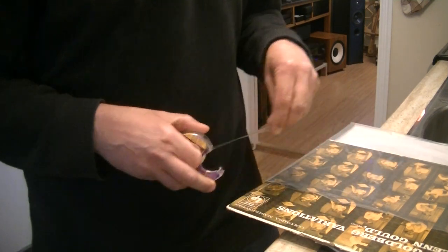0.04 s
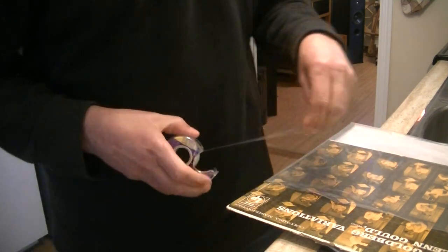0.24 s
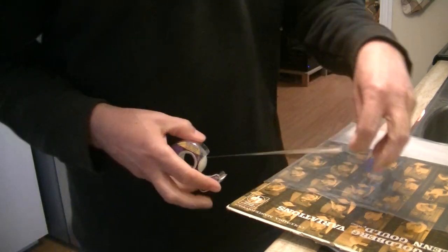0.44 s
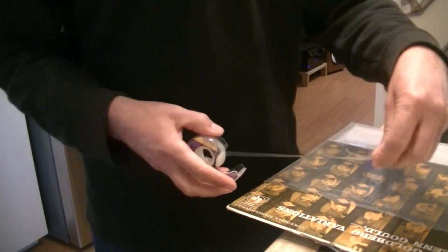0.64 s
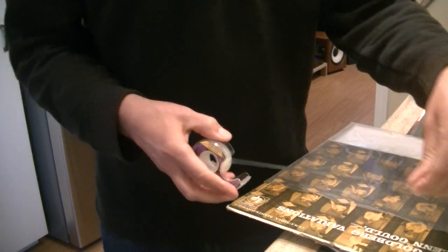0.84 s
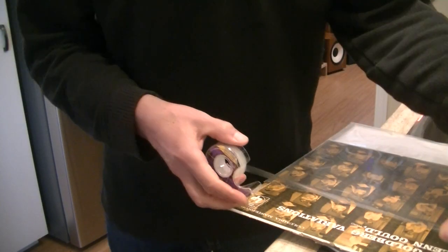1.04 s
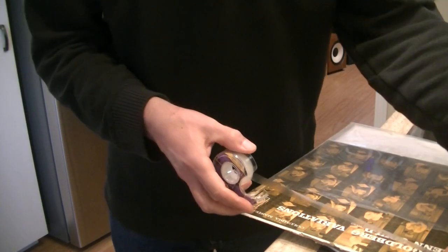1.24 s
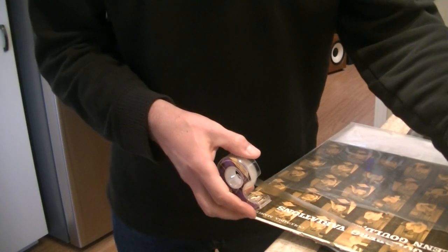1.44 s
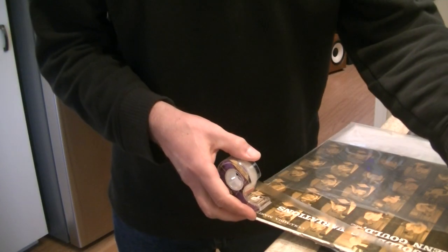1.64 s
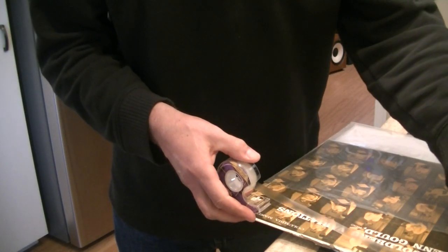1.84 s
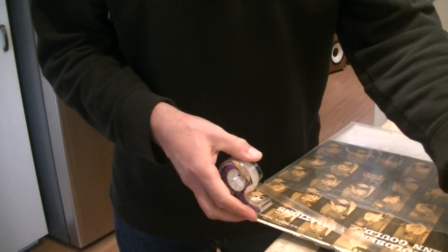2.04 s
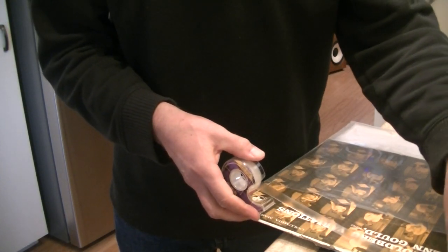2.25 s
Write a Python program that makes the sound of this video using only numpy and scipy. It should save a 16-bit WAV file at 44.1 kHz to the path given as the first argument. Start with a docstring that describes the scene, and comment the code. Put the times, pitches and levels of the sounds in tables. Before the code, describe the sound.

A quick harsh peel of sticky tape from its roll, followed by plastic clicks and faint crackle

```python
"""Adhesive tape is pulled from a small plastic hand dispenser in a quiet living room.
A faint creak, then the tape rasps off the roll: runs of stick-slip snaps ringing tape and roll.
The roll knocks in its shell (short noise rattles, coloured) as the tape unwinds with a soft hiss of grains.
The dispenser clicks in the hand, then sparse grains crackle as the tape is set down on a record sleeve.
Dull bumps of the hands, room reverberation, rumble, hiss and a faint whine lie around it."""
import sys
import numpy as np
from scipy import signal
from scipy.fft import rfft, irfft, next_fast_len
from scipy.io import wavfile

SR = 44100
rng = np.random.default_rng(int(sys.argv[2]) if len(sys.argv) > 2 else 0)


def output_pcm(signal):
    """Save a mono or channel-first signal as 16-bit PCM at the path in sys.argv[1].

    Samples are clipped to [-1, 1] before scaling.
    """
    pcm = np.clip(np.atleast_2d(signal).T, -1, 1) * 32767
    wavfile.write(sys.argv[1], SR, np.round(pcm).astype(np.int16))


N = 101297
T = np.arange(N) / SR
SIZE = next_fast_len(N // 2 + 4096) * 2   # padded FFT length
HZ = np.maximum(np.arange(SIZE // 2 + 1) * SR / SIZE, 1)
BINS = np.maximum(np.fft.rfftfreq(4096, 1 / SR), 1)   # frequency grid [Hz] for filter design


def amp(db):
    """Decibels to gain."""
    return 10 ** (np.asarray(db) / 20)


def rms_one(x):
    """Scale to unit rms."""
    return x / np.sqrt(np.mean(x ** 2) + 1e-20)


def at_hz(points, hz):
    """Read a table on a log-frequency axis."""
    f, v = np.transpose(points)
    return np.interp(np.log(hz), np.log(f), v)


def level(points):
    """Gain curve from (time [s], level [dB]) points, silent outside them."""
    s, db = np.transpose(points)
    return amp(np.interp(T, s, db)) * (T >= s[0]) * (T <= s[-1])


def response(spectrum, modes=(), extra_db=0):
    """Causal (minimum-phase) impulse response of unit energy: broad colour plus resonances."""
    db = at_hz(spectrum, BINS) + extra_db
    for hz, width_hz, lift_db in modes:
        db = db + lift_db / (1 + (2 * (BINS - hz) / width_hz) ** 2)
    # fold the cepstrum onto positive times
    cepstrum = irfft(np.log(amp(db)))
    half = len(cepstrum) // 2
    cepstrum[1:half] *= 2
    cepstrum[half + 1:] = 0
    h = irfft(np.exp(rfft(cepstrum)))[:half]
    return h / np.linalg.norm(h)


def through(x, h):
    """Filter x by the impulse response h."""
    return signal.oaconvolve(x, h)[:N]


def burst(decay_s):
    """A dense, quickly dying rattle of unit energy."""
    t = T[:SR // 20]
    h = rng.standard_normal(len(t)) * np.exp(-t / decay_s)
    return h / np.linalg.norm(h)


def grains(per_s, spread_db):
    """Tiny impulses at random times, of random size and sign; rms 1."""
    sizes = amp(spread_db * np.minimum(rng.exponential(1, N), 4))
    signs = rng.choice([-1, 1], N)
    return rms_one(sizes * signs * (rng.random(N) < per_s / SR))


def pair(alike):
    """Two noises with a given likeness (correlation)."""
    c = np.clip(alike, 0, 1)
    shared = np.sqrt(c) * rng.standard_normal(N)
    return shared + np.sqrt(1 - c) * rng.standard_normal((2, N))


# spurts of the rasp: (time [s], length [s], level [dB])
SPURTS = [(0.0162, 0.0083, -14.5), (0.0285, 0.0073, -18), (0.0367, 0.0099, -16), (0.0466, 0.0059, -12.5),
          (0.062, 0.0069, -15), (0.0787, 0.011, -16), (0.094, 0.0048, -15), (0.103, 0.0073, -16.5),
          (0.1177, 0.0051, -16), (0.1247, 0.0032, -14), (0.136, 0.0086, -18.5), (0.148, .019, -25.5),
          (0.174, 0.027, -32)]
# colour of the taut tape: (frequency [Hz], level [dB])
TAPE_COLOUR = [(100, -43.5), (380, -31), (900, -34.5), (1500, -28), (2100, -17), (2600, -13), (4000, -2.5),
               (5000, -2), (6100, -6), (7800, -14.5), (9400, -12), (10700, -21.5), (13000, -27.5),
               (15500, -38)]
# resonances of tape and roll: (frequency [Hz], width [Hz], lift [dB])
TAPE_MODES = [(2570, 160, 3.5), (3870, 60, 2), (4080, 160, 2.5), (4680, 89, 4.5), (5030, 140, 3.5),
              (5270, 90, 2.5), (6000, 120, 6.5), (9190, 130, 5), (9670, 90, 3)]
SNAPS_PER_S, SNAP_JITTER, SNAP_RING_S = 950, 0.29, 0.0011   # jitter: sd of log gap
FIRST_SNAP_DB, SNAP_SPREAD_DB = 1, 2.5
SIZZLE_HZ, SIZZLE_DB, SIZZLE_FADE_S = 9300, 9.5, 0.028   # the first spurts are the brightest
CREEP_DB = -39.5


def rasp():
    """Stick-slip: uneven runs of decaying noise snaps ring the taut tape and roll, after a faint creak."""
    snaps, t = np.zeros(N), T[:SR // 20]
    for s, length_s, db in SPURTS:
        gaps = np.exp(SNAP_JITTER * rng.standard_normal(size=40)) / SNAPS_PER_S
        delays = np.cumsum(gaps) - gaps[0]
        sizes = amp(SNAP_SPREAD_DB * rng.standard_normal(len(gaps)))
        sizes[0] = amp(FIRST_SNAP_DB)
        power = np.zeros(len(t))
        for delay, size in zip(delays, sizes):
            if delay < length_s:
                power += (size * (t >= delay) * np.exp(-np.abs(t - delay) / SNAP_RING_S)) ** 2
        spurt = np.sqrt(power) * rng.standard_normal(len(t))
        spurt = spurt / np.linalg.norm(spurt)
        i = int(s * SR)
        snaps[i:i + len(t)] += amp(db) * np.sqrt(length_s * SR) * spurt
    treble = irfft(rfft(snaps, SIZE) / (1 + (SIZZLE_HZ / HZ) ** 4))[:N]
    snaps += amp(SIZZLE_DB) * np.exp(-T / SIZZLE_FADE_S) * treble
    # the tape creaks before it lets go
    snaps += amp(CREEP_DB) * grains(per_s=2700, spread_db=0) * (T < SPURTS[0][0])
    return through(snaps, response(TAPE_COLOUR, TAPE_MODES))


# knocks and ticks of the plastic: (time [s], level [dB], decay [s], centre [Hz], lift at centre [dB],
# tilt above 1500 Hz [dB per octave], level into the room re direct [dB])
CLICKS = [(0.3233, -12.5, .0032, 2920, 6, 2, -2.5), (0.3484, -13, 0.0045, 7180, 11.5, 1.5, -3),
          (0.3494, -12.5, 0.0085, 3720, 2.5, -0.5, -4.5), (0.3552, -20, 0.0034, 4100, 4, -0.5, 0),
          (.4495, -31, 0.0035, 900, 8, 2, -16), (0.5942, -40.5, 0.0021, 2280, 1.5, -1, -13.5),
          (0.6222, -42, 0.0023, 6000, 3, 7, -5), (0.6302, -33.5, .0025, 5660, 14, 9, -3.5),
          (.647, -40, 0.0054, 5700, 8, 8.5, -2), (.7035, -45, 0.0044, 5200, 6, 8, -3),
          (0.7344, -24, 0.0027, 5800, 10, 7, -7), (0.7359, -32, 0.0042, 900, 10, 1, -3),
          (1.0479, -22, .0012, 4100, 4, -3.5, -9), (1.0484, -30.5, 0.0017, 950, 15, 2, -5.5),
          (1.2045, -38.5, 0.0014, 4880, 13.5, -2.5, -5), (1.215, -50, 0.0044, 5000, 7, 7, -4),
          (1.3285, -48.5, .002, 1970, 12, -4, 3), (1.3472, -32.5, 0.00071, 1690, 6, 1, -1),
          (1.3574, -28.5, .0007, 1747, 14, 3.5, 1), (1.3663, -40, 0.0011, 1700, 3, 10, -4),
          (1.3789, -32.5, 0.0013, 1700, -2, 4.5, 4.5), (1.4071, -30, 0.0059, 1600, 14.5, 3.5, -8),
          (1.715, -46.5, .002, 1720, 9, -12, -4), (1.865, -60, .006, 2200, 8, -6, -5),
          (1.999, -57, .005, 2400, 1, -3, -8), (2.157, -53.5, .003, 1215, 19, -7, -1)]
# colour of the plastic shell: (frequency [Hz], level [dB])
SHELL_COLOUR = [(100, -51), (360, -18.5), (600, -34), (1100, -33), (1600, -21.5), (2400, -5), (4000, -4.5),
                (5000, -7), (6500, -10.5), (8800, -10.5), (10500, -17.5), (13000, -28), (15500, -32.5)]
# resonances of the shell: (frequency [Hz], width [Hz], lift [dB])
SHELL_MODES = [(2640, 100, 3.5), (3606, 160, 3), (4150, 260, 6), (5020, 90, 8.5), (7490, 28, 10),
               (8760, 140, 2), (11900, 140, 4)]
CRACK_S, CRACK_DB = .0005, -4   # extra onset, re the rattle


def clicks():
    """Plastic contacts: a crack and short rattle in the shell; returns direct sound and room feed."""
    out = np.zeros((2, N + SR))
    for s, db, decay_s, hz, lift_db, tilt_db, room_db in CLICKS:
        hit = burst(decay_s)
        hit = hit * (1 + amp(CRACK_DB) * np.exp(-T[:len(hit)] / CRACK_S))
        octaves = np.log2(BINS / hz)
        lift = lift_db * np.exp(-(octaves / .3) ** 2)
        tilt = tilt_db * np.log2(np.maximum(BINS, 1500))
        hit = rms_one(through(hit, response(SHELL_COLOUR, SHELL_MODES, lift + tilt)))
        hit = hit * np.sqrt(decay_s * SR / 2 / len(hit))   # energy follows decay time
        i = int(s * SR)
        out[:, i:i + len(hit)] += amp([[db], [db + room_db]]) * hit
    return out[:, :N]


# smooth unwinding: (time [s], level [dB])
PULL = [(.2, -44), (.43, -38.5), (.52, -70), (.62, -54.5), (.765, -55.5), (.787, -45.5), (.82, -45.5),
        (.885, -42), (.95, -48), (1.0, -54.5), (1.06, -55.5), (1.13, -74), (1.2, -90)]
# colour of the peeling tape: (frequency [Hz], level [dB])
PEEL_COLOUR = [(200, -15), (700, -21.5), (1200, -26), (1900, -12), (2400, -6), (3100, -3), (4200, -2),
               (5500, -3.5), (7000, -15), (9200, -13.5), (11000, -27), (15500, -35)]
# resonances of the peeling tape: (frequency [Hz], width [Hz], lift [dB])
PEEL_MODES = [(1780, 130, 2.4), (3035, 120, 9.3), (5300, 150, 7.8)]
# rub of the roll's hub: (time [s], level [dB])
HUB = [(.35, -69), (.5, -61), (.8, -62), (1.07, -57), (1.17, -67), (1.25, -87)]
# colour of the hub: (frequency [Hz], level [dB])
HUB_COLOUR = [(500, -32), (1400, -17), (1800, -1.5), (2300, -12), (3600, -15), (5000, -18), (12000, -58)]


def unwinding():
    """Fine peeling grains and the rub of the hub, each filtered by its colour."""
    peel = through(grains(per_s=5000, spread_db=2), response(PEEL_COLOUR, PEEL_MODES))
    rub = through(grains(per_s=4000, spread_db=3), response(HUB_COLOUR))
    return level(PULL) * peel + level(HUB) * rub


# tape crackling against the sleeve: (time [s], level [dB])
CRINKLE = [(1.27, -83), (1.32, -60), (1.345, -51), (1.362, -44), (1.385, -46), (1.402, -48), (1.42, -59),
           (1.45, -73), (1.5, -85)]
# colour of the crackle: (frequency [Hz], level [dB])
CRINKLE_COLOUR = [(200, -32), (1000, -16.5), (1600, -0.5), (2600, 0), (4000, 6.5), (6500, 3), (8000, -8),
                  (9500, 2), (11000, -17), (15500, -34)]


def crinkle():
    """Sparse crackle as the tape is pressed down."""
    return through(level(CRINKLE) * grains(per_s=1000, spread_db=3.5), response(CRINKLE_COLOUR))


# soft bumps of the hands: (time [s], frequency [Hz], level [dB], length [s])
BUMPS = [(.272, 180, -49.5, 0.0095), (0.375, 346, -54.5, 0.014), (0.46, 370, -58, .011),
         (0.643, 198, -59.5, .012), (1.073, 326, -52, 0.012), (2.008, 350, -54.5, 0.0075),
         (2.19, 340, -62, 0.015)]


def bumps():
    """Dull, brief swells of a low tone from the handling."""
    out = np.zeros(N)
    for s, hz, db, length_s in BUMPS:
        swell = np.exp(-((T - s) / length_s) ** 2)
        out += amp(db) * swell * np.sin(2 * np.pi * (hz * T + rng.random()))
    return out


# reverberation time: (frequency [Hz], T60 [s])
ROOM_T60 = [(200, 0.55), (1500, 0.42), (4000, 0.44), (8000, 0.37), (15000, 0.33)]
ROOM_ALIKE, ROOM_GAP_S, ROOM_BUILD_S = .7, 0.0022, 0.0013
EARLY_DB, EARLY_DECAY_S = 3, 0.012   # reflections from table and body


def room(x):
    """Strong early reflections, then a diffuse noise tail whose decay time varies with frequency."""
    t = T[:SR]
    white, tail = rfft(pair(ROOM_ALIKE), SIZE), 0
    for k, (_, t60_s) in enumerate(ROOM_T60):
        # overlapping bands that sum to one
        share = at_hz([(hz, j == k) for j, (hz, _) in enumerate(ROOM_T60)], HZ)
        tail = tail + irfft(white * share)[:, :SR] * amp(-60 * t / t60_s)
    tail = tail * (1 + amp(EARLY_DB) * np.exp(-t / EARLY_DECAY_S))
    tail = tail * (1 - np.exp(-np.maximum(t - ROOM_GAP_S, 0) / ROOM_BUILD_S))
    return np.array([through(x, h / np.linalg.norm(h)) for h in tail])


# colour of quiet room and hiss: (frequency [Hz], level [dB])
FLOOR_COLOUR = [(25, -11), (45, -10), (65, -2.5), (125, 1.5), (200, -3), (370, 0), (480, -9.5),
                (700, -13.5), (1200, -16), (2000, -12), (2800, -10), (4000, -11.5), (6500, -13),
                (10000, -16), (15500, -23)]
FLOOR_DB, RUMBLE_ALIKE, RUMBLE_HZ, RUMBLE_PAN_DB = -57.5, 0.26, 700, -2.5   # pan: left re right
WHINE_HZ, WHINE_WIDTH_HZ, WHINE_DB = 7883, 70, -76


def background():
    """Room rumble partly shared by both sides, separate hiss in each, and a faint narrow-band whine."""
    low = 1 / (1 + (HZ / RUMBLE_HZ) ** 2)   # power share of the rumble
    panned = pair(RUMBLE_ALIKE) * amp([[RUMBLE_PAN_DB / 2], [-RUMBLE_PAN_DB / 2]])
    rumble = rfft(panned, SIZE) * np.sqrt(low)
    hiss = rfft(pair(0), SIZE) * np.sqrt(1 - low)
    white = irfft(rumble + hiss)[:, :N]
    floor = np.array([through(w, response(FLOOR_COLOUR)) for w in white])
    peak = 1 / (1 + (2 * (HZ - WHINE_HZ) / WHINE_WIDTH_HZ) ** 2)
    whine = irfft(rfft(pair(0), SIZE) * peak)[:, :N]
    return amp(FLOOR_DB) * floor + amp(WHINE_DB) * rms_one(whine)


# sideways share of the near sound: (frequency [Hz], level [dB])
WIDTH = [(400, -3.5), (1500, -11), (7000, -8), (10000, -6.5), (13000, 4)]
PAN_DB = -2   # left re right


def scene():
    """The dispenser sits a little to the right; near reflections widen it and the room answers."""
    ripping, soft = rasp(), unwinding() + crinkle()
    knocks, knocks_to_room = clicks()
    direct = ripping + knocks + soft + bumps()
    reflected = through(direct, burst(decay_s=.0015))
    side = irfft(rfft(reflected, SIZE) * amp(at_hz(WIDTH, HZ)))[:N]
    near = (direct + side * [[1], [-1]]) * amp([[PAN_DB / 2], [-PAN_DB / 2]])
    far = room(amp(-2.5) * ripping + amp(1.0) * knocks_to_room + amp(-7.5) * soft)
    return near + far * amp([[-.5], [.5]]) + background()


CEILING, CUTOFF_HZ = 1.73, 15800


def record(dry):
    """Peaks are rounded by tanh and the top is cut steeply."""
    rounded = CEILING * np.tanh(dry / CEILING)
    return irfft(rfft(rounded, SIZE) / np.sqrt(1 + (HZ / CUTOFF_HZ) ** 160))[:, :N]


dry = scene()
out = record(dry)
output_pcm(out)
```